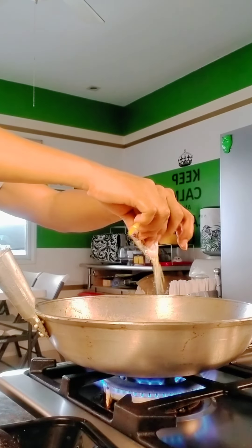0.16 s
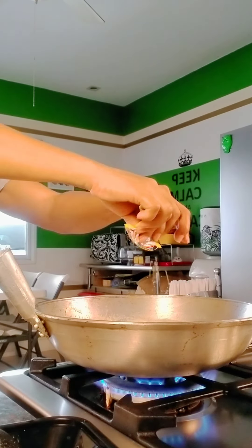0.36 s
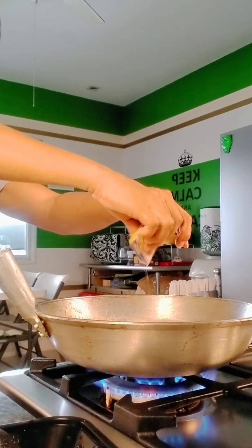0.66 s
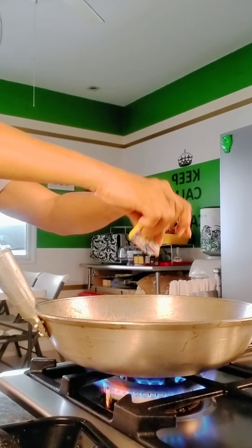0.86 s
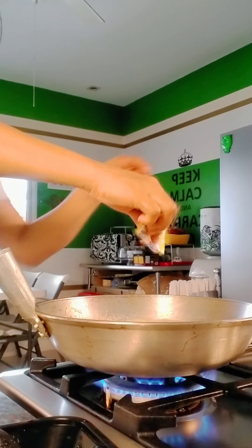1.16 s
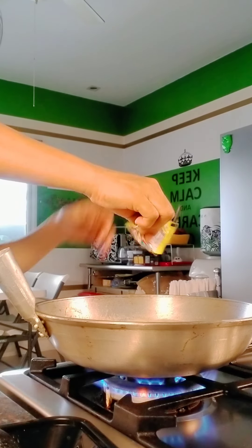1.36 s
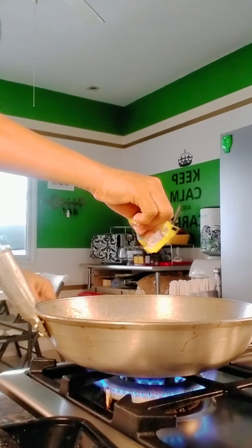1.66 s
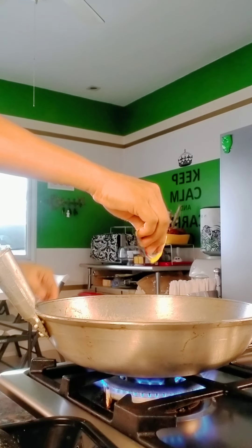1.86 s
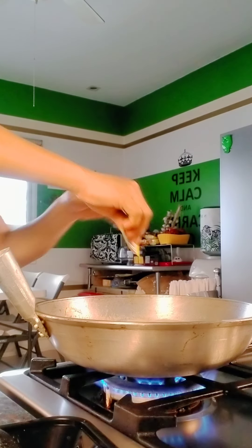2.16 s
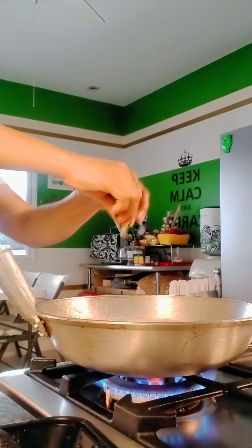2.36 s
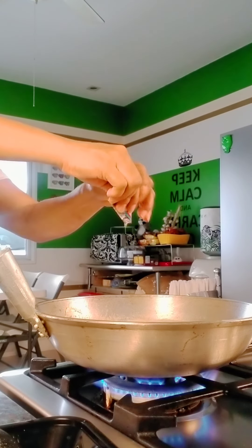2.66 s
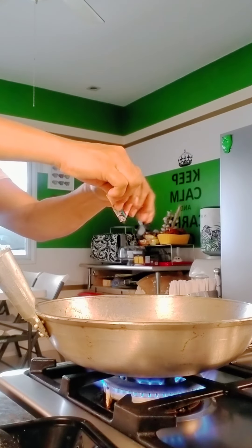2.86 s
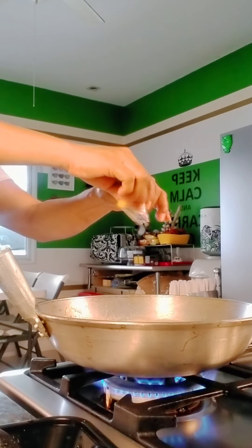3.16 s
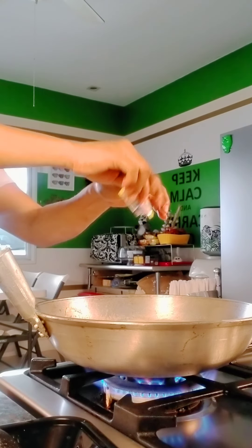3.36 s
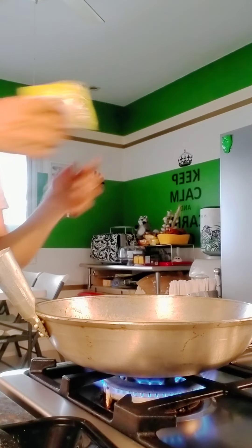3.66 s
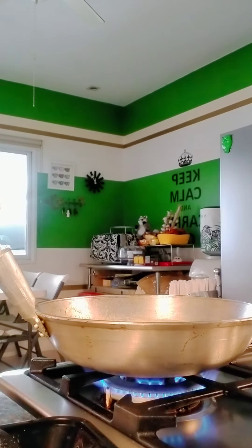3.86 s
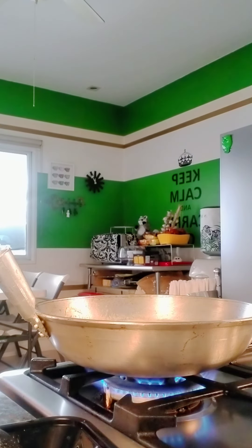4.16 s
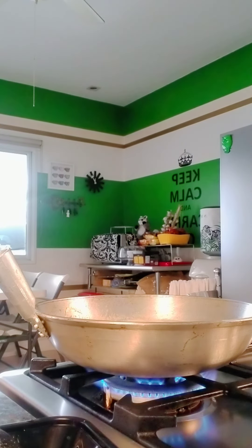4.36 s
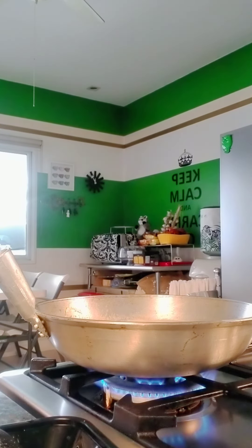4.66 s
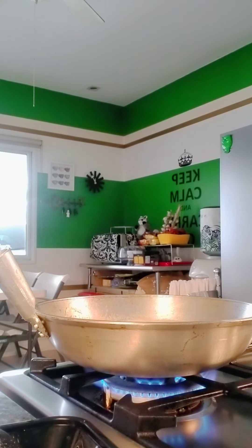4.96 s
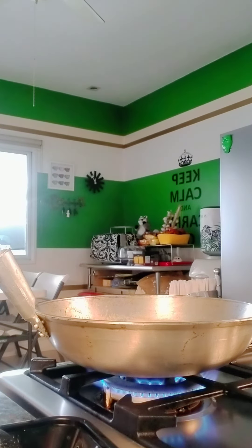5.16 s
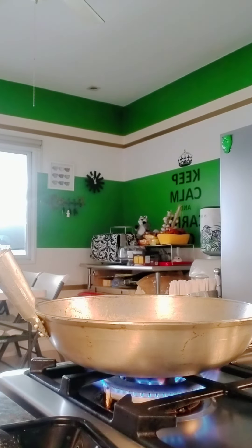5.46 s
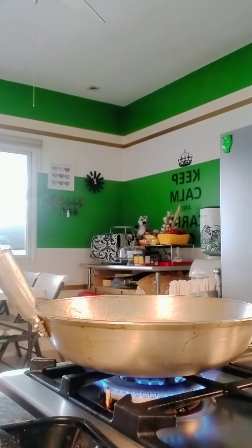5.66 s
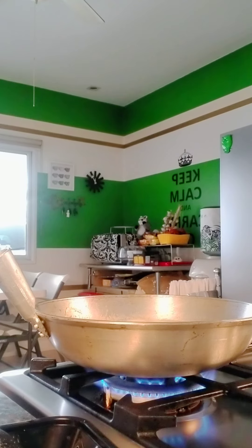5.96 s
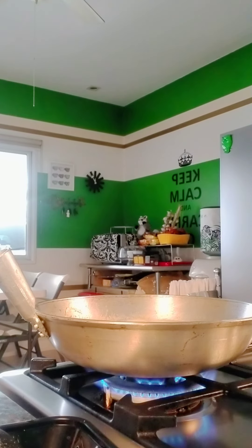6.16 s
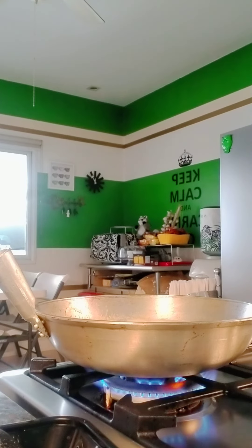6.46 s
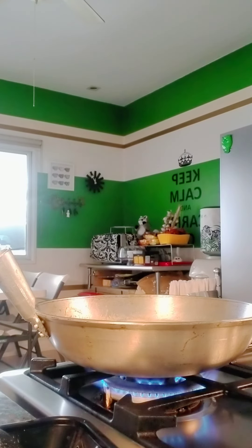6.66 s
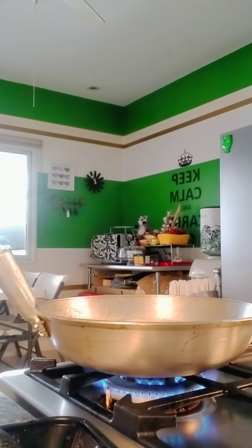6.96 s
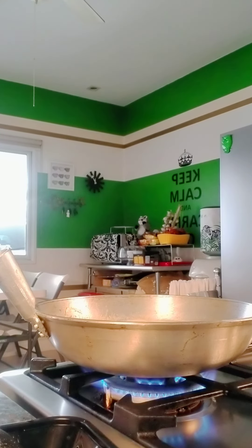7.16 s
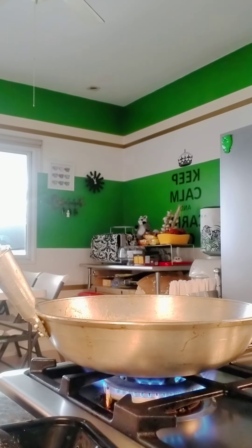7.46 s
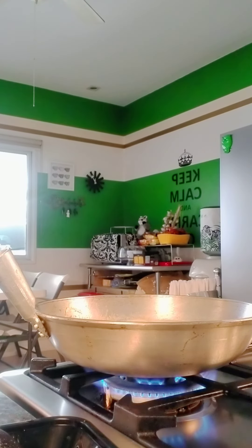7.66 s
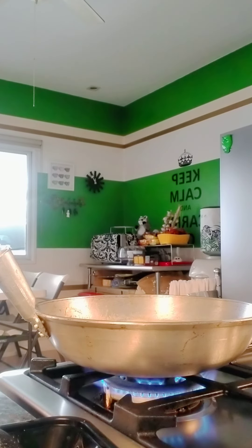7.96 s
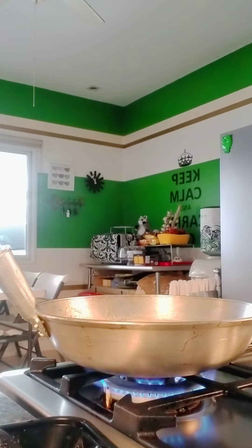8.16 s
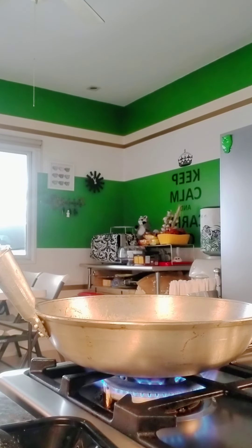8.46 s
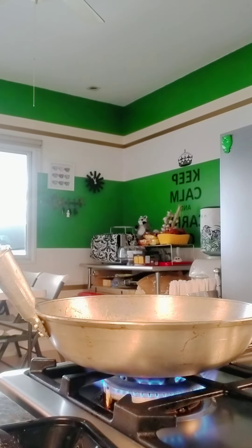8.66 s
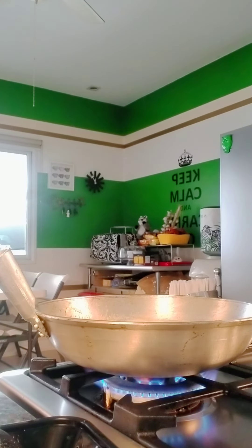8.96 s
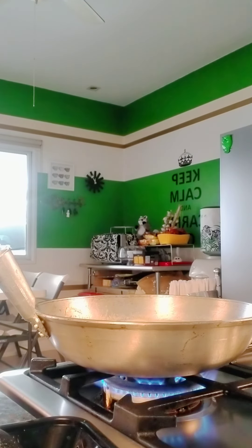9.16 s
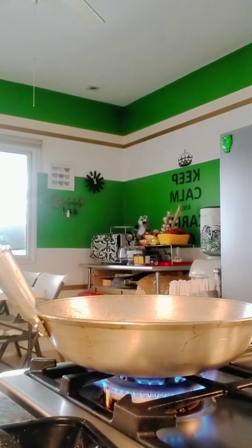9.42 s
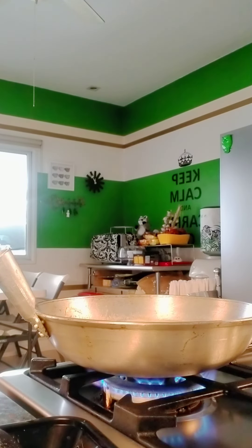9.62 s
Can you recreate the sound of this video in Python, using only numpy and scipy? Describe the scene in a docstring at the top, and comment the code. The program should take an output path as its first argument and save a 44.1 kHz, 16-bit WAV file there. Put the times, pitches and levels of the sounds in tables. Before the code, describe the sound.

Close, bright crinkling of a small plastic sachet with rhythmic rattling doses of dry granules for about three seconds, then thinner crackles. Around the middle come a cluster of hard wooden clacks and a few later knocks; later a drawer rolls briefly with a low rumble. A faint gas flame hisses and roars softly throughout. Mono, bass-light phone-like microphone in a hard-walled kitchen.

```python
"""A small plastic seasoning sachet crinkles and snaps as it is shaken and crumpled over a wok.
Film buckles as random click showers and resonant facet noise; granules are denser, coloured clicks.
Wooden clacks are noise cracks on damped modes; a drawer then rolls, its grain noise scaled by its speed.
A gas flame of filtered noise and faint tones runs beneath, all heard in mono in a hard-walled kitchen."""
import sys
import numpy as np
from scipy import signal
from scipy.fft import rfft, irfft, next_fast_len
from scipy.io import wavfile
from scipy.ndimage import map_coordinates

SR = 44100
rng = np.random.default_rng(int(sys.argv[2]) if len(sys.argv) > 2 else 0)


def file_out(sig):
    """Save sig as 16-bit WAV at sys.argv[1]."""
    # one column per channel
    cols = np.atleast_2d(sig).T
    # limit, then scale
    lim = np.clip(cols, -1, 1)
    pcm = np.round(lim * 32767).astype(np.int16)
    wavfile.write(sys.argv[1], SR, pcm)


N = 431738

RELAX_T60_S = 0.18  # release of the squeezed film and of the trickle of granules


def amp(db):
    """Logarithmic level: decibels become an amplitude ratio."""
    return 10 ** (np.asarray(db) / 20)


def unit(x):
    """Normalization: the signal is scaled to a root-mean-square value of 1."""
    return x / np.sqrt(np.mean(x ** 2) + 1e-20)


def along(points, hz):
    """Logarithmic pitch: (Hz, value) points are interpolated on a log-frequency axis."""
    point_hz, values = np.transpose(points)
    return np.interp(np.log(hz + 1), np.log(point_hz + 1), values)


def wobble(rate):
    """Slow random modulation: a smooth curve through Gaussian knots, rate of them a second."""
    knots = rng.standard_normal(int(N * rate / SR) + 4)
    return map_coordinates(knots, [np.arange(N) * rate / SR])


def coloured(x, spectrum):
    """Minimum-phase filtering: folding the cepstrum makes a causal response of unit power gain."""
    size = 4096
    magnitude = unit(amp(along(spectrum, np.fft.rfftfreq(size, 1 / SR))))
    cepstrum = irfft(np.log(magnitude))
    cepstrum[1:size // 2] *= 2
    cepstrum[size // 2 + 1:] = 0
    response = irfft(np.exp(rfft(cepstrum)))
    return signal.fftconvolve(x, response)[:len(x)]


def grains(rate, spread_db):
    """Shot noise: random impulses of uneven size and either sign, rate of them a second, at rms 1."""
    present = rng.random(N) < rate / SR
    size = amp(spread_db * np.minimum(rng.standard_normal(N), 2))
    sign = rng.choice([-1, 1], N)
    return unit(present * size * sign)


def add(track, s, sound):
    """Superposition: a sound is summed into the track from time s in seconds."""
    part = track[max(round(s * SR), 0):][:len(sound)]
    part += sound[:len(part)]


def ring(modes, t, scatter_db):
    """Modal vibration: damped sinusoids sum, with a random phase and strength at each strike."""
    total = np.zeros(len(t))
    for hz, db, t60 in modes:
        strength_db = db + scatter_db * rng.standard_normal()
        total += amp(strength_db - 60 * t / t60) * np.sin(2 * np.pi * hz * t + 2 * np.pi * rng.random())
    return total


def stroke(s, length, rise, t60):
    """Envelope of a gesture: exponential onset at s, a hold for length, then exponential decay."""
    t = np.arange(round((length + 1.5 * t60) * SR)) / SR
    envelope = np.zeros(N)
    onset = 1 - np.exp(-t / rise)
    release = amp(-60 * np.maximum(t - length, 0) / t60)
    add(envelope, s, onset * release)
    return envelope


def crackle(rate, spread_db, t60, colour_db):
    """Crackling noise: abrupt random bursts, each with its own balance of bands, decay exponentially."""
    # Borders in Hz between the bands whose strength varies from click to click.
    band_edges = [1400, 2200, 3200, 4500, 6200, 8200]
    clicks = grains(rate, spread_db)
    at = np.flatnonzero(clicks)
    size = next_fast_len(N)
    noise = rfft(rng.standard_normal(size))
    band = np.searchsorted(band_edges, np.fft.rfftfreq(size, 1 / SR))
    energy_keep = amp(-120 / (t60 * SR))  # energy left after one sample
    sound = np.zeros(N)
    for k in range(len(band_edges) + 1):
        strengths = clicks[at] * amp(colour_db * rng.uniform(-1, 1, len(at)))
        deposits = np.bincount(at, strengths ** 2, N)
        energy = signal.lfilter([1], [1, -energy_keep], deposits)
        sound += np.sqrt(energy) * irfft(noise * (band == k), size)[:N]
    return unit(sound)


def sachet():
    """Buckling instability: squeezed film gives showers of tiny clicks, and whole facets snap through."""
    # Squeezes and rubs of the fingers. Each row: start in seconds, length in seconds, relative level in dB.
    squeezes = [(0.0, .58, -38), (0.636, .09, -39), (0.81, 0.11, -49), (0.937, 1.16, -38.5),
                (2.287, 0.048, -38), (2.37, 0.037, -42.5), (2.45, 0.25, -49), (2.524, 0.055, -40),
                (2.742, 0.23, -39), (3.0, 0.03, -40), (3.102, .21, -39.5), (3.425, .005, -48),
                (3.513, 0.066, -44.5), (3.58, .1, -55), (3.782, .01, -48), (3.86, 0.077, -42.5),
                (3.986, 0.043, -46.5), (4.48, 0.076, -66), (4.705, 0.17, -55.5), (4.931, 0.052, -44),
                (5.01, .012, -45.5), (5.104, 0.02, -39.5), (5.158, 0.025, -40.5), (5.296, 0.055, -52.5),
                (7.956, 0.059, -50.5), (8.142, 0.031, -51.5)]
    # Loudest buckles. Each row: time in seconds, relative level in dB, facet pitch in Hz (capped at SR / 3).
    snaps = [(0.038, -14, 3170), (0.1, -12, 3500), (0.134, -15, 6800), (0.162, -13.5, 6710),
             (0.2298, -13.5, 6950), (0.2538, -20, 1870), (0.5746, -16.5, 6800), (0.6404, -11, 4950),
             (0.6546, -18, 7090), (0.817, -23.5, 3100), (0.8818, -19, 7090), (0.9357, -17, 7160),
             (1.0193, -11.5, 6470), (1.1324, -19, 1880), (1.29, -12.5, 7440), (1.3275, -12, 6140),
             (1.417, -20, 2800), (1.4502, -22, 4920), (1.736, -14.5, 2390), (1.8846, -16.5, 6040),
             (1.953, -16.5, 3620), (2.0108, -13.5, 2600), (2.2314, -21, 6400), (2.2574, -23, 7050),
             (2.2933, -20, 6930), (2.377, -27, 6630), (2.4507, -26, 4700), (2.4692, -24, 6630),
             (2.5237, -22, 6940), (2.5583, -23.5, 6890), (2.6652, -19, 6000), (2.709, -18.5, 5950),
             (2.7477, -14, 6270), (3.092, -19, 7080), (3.1118, -21, 2820), (3.1732, -17.5, 6890),
             (3.2494, -17, 3790), (3.4305, -27, 7100), (3.5045, -18.5, 7100), (3.535, -18.5, 7060),
             (3.578, -27, 6830), (3.621, -23, 2210), (3.7258, -26, 1760), (3.7787, -23.5, 7500),
             (3.79, -24, 2820), (3.8604, -31, 6860), (3.9137, -22.5, 7700), (3.9843, -25.5, 2720),
             (4.7485, -30.5, 2370), (4.9377, -30, 2670), (4.9588, -22.5, 2350), (5.0168, -23, 2190),
             (5.1056, -32, 7200), (5.1164, -24, 7800), (5.5835, -16, 2590), (5.694, -26, 2140),
             (5.8769, -23.5, 1870), (5.916, -26, 7100), (7.961, -26.5, 6900)]
    # Spectrum of the film. Each row: frequency in Hz, relative density in dB.
    film_spectrum = [(400, -35), (1000, -2), (1700, 1.5), (2700, 5), (4200, 0), (5800, -1), (7400, 3),
                     (10500, 3.5), (13500, 3), (16000, 2.5)]
    grip_s = 0.001
    bite_db, bite_t60_s = -4, 0.056  # extra strength at the start of a squeeze, against that squeeze
    handling = np.zeros(N)
    for s, length, db in squeezes:
        hold = stroke(s, length, grip_s, RELAX_T60_S)
        bite = amp(bite_db) * stroke(s, 0, grip_s, bite_t60_s)
        handling = np.maximum(handling, amp(db) * (hold + bite))
    creases = crackle(rate=650, spread_db=3.5, t60=0.018, colour_db=4)
    film = amp(5.0) * handling * creases
    t = np.arange(SR // 8) / SR
    tick = 0.23 * amp(-60 * t / 0.0049)
    fold = np.exp(-(t / 0.012) ** 2)  # the fold runs across the facet
    shiver = amp(-7.5) * amp(-60 * t / 0.088)  # then the whole sheet settles
    burst = tick + fold + shiver
    facets = np.zeros(N)
    for s, db, hz in snaps:
        add(film, s, amp(db - 17) * burst * rng.standard_normal(len(t)))
        resonance = signal.iirpeak(min(hz, SR / 3), 3.5, SR)
        facet = signal.lfilter(*resonance, rng.standard_normal(len(t)))
        add(facets, s, amp(db - 19.5) * burst * unit(facet))
    return coloured(film, film_spectrum) + facets


def seasoning():
    """Granular impact: many small collisions rattle in doses; a tap adds a pulse and packet modes."""
    # Shakes of the sachet. Each row: time of the dose's peak in seconds, relative level in dB.
    shakes = [(0.26, -31), (0.39, -26), (0.465, -34.5), (0.648, -31), (0.965, -33), (1.144, -27),
              (1.305, -29), (1.47, -27), (1.62, -25.5), (1.773, -26.5), (1.94, -27), (2.06, -35.5),
              (2.315, -32), (2.56, -46), (2.762, -27.5), (2.905, -36), (3.115, -33), (3.27, -36.5)]
    # Spectrum of the granules. Each row: frequency in Hz, relative density in dB.
    granule_spectrum = [(400, -21.5), (800, 0), (1350, -22), (1750, 3.5), (2300, -7.5), (3400, 0.5),
                        (4500, -1), (6200, -1), (7500, 1), (8800, -10), (16000, -13.5)]
    # A finger taps the sachet: time in seconds, relative level in dB.
    tap = (1.303, -19.5)
    # Modes of the half-full sachet. Each row: frequency in Hz, relative level in dB, t60 in seconds.
    packet_modes = [(178, -6, 0.046), (1350, 3, 0.037)]
    rise_s, fall_s = 0.017, 0.04  # time constants of a dose
    # a thin trickle goes on for two seconds while the sachet is tipped
    flow = amp(-46.5) * stroke(0.0, 2, rise_s, RELAX_T60_S)
    lag = np.arange(-SR // 8, SR // 3) / SR
    dose = np.exp(np.minimum(lag / rise_s, -lag / fall_s))
    for s, db in shakes:
        add(flow, s + lag[0], amp(db) * dose)
    patter = crackle(rate=700, spread_db=4, t60=0.011, colour_db=7)
    pour = amp(-2.5) * flow * coloured(patter, granule_spectrum)
    s, db = tap
    t = np.arange(SR // 10) / SR
    u = t / 0.00073
    pulse = (1 - u) * np.exp(-u)
    rustle = amp(-4) * amp(-60 * t / 0.018) * rng.standard_normal(len(t))
    dull_band = signal.butter(2, [210, 1700], "band", fs=SR, output="sos")
    add(pour, s, amp(db + 8.0) * signal.sosfilt(dull_band, pulse + rustle))
    add(pour, s, amp(db - 16) * ring(packet_modes, t, scatter_db=0.5))
    return pour


def knocks():
    """Impact and friction: each contact cracks, excites wood and hollow modes, and ends in a rub."""
    # Wooden contacts. Each row: time in seconds, relative clack level in dB, relative hollow-body level in dB.
    contacts = [(5.3256, -30, -42), (5.3639, -33, -43), (5.3861, -24, -55), (5.4037, -20.5, -60),
                (5.429, -13, -26), (5.468, -25, -42), (5.4934, -10, -29), (5.5387, -21, -37),
                (5.5818, -24, -54), (5.8226, -30.5, -64), (5.8767, -24.5, -33.5), (5.9515, -25.5, -32.5),
                (6.084, -34.5, -62)]
    # Slides of the wood. Each row: start in seconds, length in seconds, relative level in dB.
    slides = [(5.32, 0.072, -45.5), (5.897, 0.079, -41)]
    # Modes of the wood, then of the hollow. Each row: frequency in Hz, relative level in dB, t60 in seconds.
    wood_modes = [(1278, 0, 0.07), (1450, -8, 0.035), (1680, -1, 0.073), (1856, 2, 0.062), (2280, -19, .06),
                  (2300, -7, 0.1), (2840, -7, 0.05), (3170, -5, 0.049), (3680, -7, 0.072)]
    hollow_modes = [(125, -19, .12), (190, -6, 0.15), (385, -4, 0.11), (419, 1, 0.07), (503, 2.5, 0.086),
                    (573, -5, 0.081), (653, -7, 0.087), (733, -12, 0.21)]
    # Spectra of the crack, then of the rub. Each row: frequency in Hz, relative density in dB.
    clack_spectrum = [(100, -36), (300, -4), (700, 1), (1300, 4), (3400, 0.5), (4200, -5.5), (7000, -11.5),
                      (16000, -13.5)]
    rub_spectrum = [(50, -55), (85, -20), (120, -3), (180, 0.5), (290, -7), (420, -1), (750, -13),
                    (1200, -25), (2400, -12), (5000, -33.5), (16000, -25)]
    rub_db, rub_t60_s = -24, 0.21  # the rub after a contact, against the table's clack level
    t = np.arange(SR // 3) / SR
    cracks, wood, friction = np.zeros(N), np.zeros(N), np.zeros(N)
    for s, length, db in slides:
        friction += amp(db) * stroke(s, length, rise=0.015, t60=0.17)
    crack = amp(-60 * t / 0.0067) + amp(-3.5) * amp(-60 * t / 0.091)
    hollow_onset = 1 - np.exp(-t / 0.0032)
    for s, db, body_db in contacts:
        add(cracks, s, amp(db - 11) * crack * rng.standard_normal(len(t)))
        add(wood, s, amp(db - 18) * ring(wood_modes, t, scatter_db=0))
        add(wood, s, amp(body_db + 1) * ring(hollow_modes, t, scatter_db=1.5) * hollow_onset)
        add(friction, s, amp(db + rub_db - 60 * t / rub_t60_s))
    rubbing = friction * coloured(grains(rate=1200, spread_db=4.5), rub_spectrum)
    return coloured(cracks, clack_spectrum) + wood + rubbing


def drawer():
    """Rolling contact: small bumps rumble and scrape with speed, and jolts ring the panels and rails."""
    # Motion of the drawer. Each row: time in seconds, speed from 0 to 1.
    motion = [(8.177, 0.1), (8.187, 1), (8.28, 0.88), (8.61, 0.01)]
    # Jolts on the way. Each row: time in seconds, relative level in dB, ringing panel's pitch in Hz.
    jolts = [(8.181, -21, 212), (8.248, -20.5, 540.6), (8.281, -23, 179), (8.358, -22, 508),
             (8.381, -30, 196), (8.478, -35, 500)]
    # Modes of the rails. Each row: frequency in Hz, relative level in dB, t60 in seconds.
    rail_modes = [(729, 3, 0.22), (1002, 3, 0.27), (1435, 3, .2), (2345, -5, 0.27)]
    # Spectra of the box, then of the runners. Each row: frequency in Hz, relative density in dB.
    box_spectrum = [(30, -58), (55, -38), (76, -23), (94, 1), (120, 2.5), (145, -5.5), (195, 1), (270, 0),
                    (320, -8), (395, -3), (450, -4), (520, -3), (640, -6.5), (740, -7), (1000, -15),
                    (1400, -36)]
    runner_spectrum = [(600, -8), (1200, 1), (1450, 5.5), (2000, 1), (2450, 2.5), (3200, -2.5),
                       (3900, -11.5), (7200, -11.5), (16000, -13)]
    speed = np.interp(np.arange(N) / SR, *np.transpose(motion), left=0, right=0)
    rumble = amp(-29.5) * speed
    scrape = amp(-33) * speed ** 1.52  # as the drawer slows, the scrape dies before the rumble
    scrape += amp(-46) * stroke(8.145, 0.028, rise=0.008, t60=0.046)  # a creak as the hand takes hold
    box = rumble * coloured(grains(rate=1500, spread_db=3.5), box_spectrum)
    rails = scrape * coloured(grains(rate=4000, spread_db=2.5), runner_spectrum)
    t = np.arange(SR // 3) / SR
    swell = (1 - np.exp(-t / 0.01)) * np.exp(-(t / 0.036) ** 2)
    for s, db, hz in jolts:
        panel = amp(-1.5) * swell * np.sin(2 * np.pi * hz * t)
        rail = amp(-21.5) * ring(rail_modes, t, scatter_db=1)
        add(box, s, amp(db) * (panel + rail))
    return box + rails


def burner():
    """Turbulent combustion: broadband roar and gas-jet hiss fluctuate slowly beside faint steady tones."""
    # Level of the burner. Each row: time in seconds, relative level in dB.
    flame = [(0.0, -47.5), (1.0, -46.5), (3.9, -47), (4.4, -51), (5.3, -46), (6.5, -50.5), (7.8, -51.5),
             (8.3, -44.5), (9.0, -49), (9.79, -48)]
    # Spectra of the roar, then of the gas jet. Each row: frequency in Hz, relative density in dB.
    roar_spectrum = [(25, -67), (47, -43), (58, -11), (75, -16.5), (120, -3.5), (200, 0), (300, -3.5),
                     (410, -4), (620, -7.5), (760, 1), (950, 3), (1060, -6.5), (1220, -3), (1400, -26),
                     (2500, -33)]
    jet_spectrum = [(700, -20), (1400, 1), (3000, 0.5), (3800, -8.5), (4900, -11.5), (7100, -8),
                    (10500, -7.5), (16000, -3.5)]
    # Tones under the flame. Each row: frequency in Hz, mean level in dB against the burner level.
    hum_tones = [(209, -12), (290.7, -10.5), (5093, -29)]
    # A thin tone by the stove that fades away. Each row: time in seconds, level in dB.
    whine_level = [(0, -52.5), (3.8, -54.5), (9.79, -69)]
    whine_hz = 519.6
    t = np.arange(N) / SR
    level = amp(np.interp(t, *np.transpose(flame)))
    roar = amp(1.5 + 0.83 * wobble(9.8)) * coloured(rng.standard_normal(N), roar_spectrum)
    jet = amp(-3.5 + 0.22 * wobble(3.1)) * coloured(rng.standard_normal(N), jet_spectrum)
    hum = np.zeros(N)
    for hz, db in hum_tones:
        hum += amp(db + 1.7 * wobble(2.6)) * np.sin(2 * np.pi * hz * t + 0.5 * wobble(4))
    whine = np.sin(2 * np.pi * whine_hz * t + 0.53 * wobble(3.8))
    whine *= amp(np.interp(t, *np.transpose(whine_level)))
    return level * (roar + jet + hum) + whine


def kitchen(x):
    """Diffuse reverberation: convolution with noise whose decay time depends on frequency."""
    # Reverberation of the room. Each row: frequency in Hz, t60 in seconds.
    decay = [(150, 0.74), (1000, 0.49), (4000, 0.69), (8000, 0.58), (15000, 0.66)]
    hz, t, z = signal.stft(rng.standard_normal(SR * 2 // 3), SR, nperseg=256)
    fading = amp(-60 * t / along(decay, hz)[:, None])
    tail = signal.istft(z * fading, SR, nperseg=256)[1]
    tail = np.pad(tail, (round(0.008 * SR), 0))  # 8 ms before the tail begins
    return signal.fftconvolve(x, tail / np.linalg.norm(tail))[:N]


def scene():
    """Superposition: direct sounds, their shares of the room's reverberation and the dry burner sum in mono."""
    near, wood, roll = sachet() + seasoning(), knocks(), drawer()
    room = kitchen(amp(-6.0) * near + amp(-10.5) * wood + amp(-8.0) * roll)
    mono = near + wood + roll + room + burner()
    return np.array([mono, mono])


def record(dry):
    """Transduction: a microphone port colours the sound, its treble power is limited, its band is cut off."""
    # Response of the port, with little bass. Each row: frequency in Hz, gain in dB.
    port = [(25, -19), (42, -16), (57, 0.5), (3200, 0), (4500, -0.5), (5600, 0.5), (7100, 3.5),
            (7700, -1.5), (8200, -5.5), (10500, -8.5), (13300, -3), (16000, -7.5)]
    split_hz, top_hz = 8200, 15950  # lower edge of the limited treble, upper edge of the band
    ceiling_db, average_s = -39, 0.0019  # soft power ceiling and averaging time of the limiter
    size = next_fast_len(N + SR // 2)
    hz = np.fft.rfftfreq(size, 1 / SR)
    heard = rfft(dry, size) * amp(along(port, hz))
    treble = irfft(heard * (hz > split_hz), size)
    keep = np.exp(-1 / (average_s * SR))
    power = signal.lfilter([1 - keep], [1, -keep], treble[0] ** 2)
    gain = np.sqrt(1 / np.hypot(1, power / amp(ceiling_db) ** 2))
    limited = heard + rfft(treble * (gain - 1))
    return irfft(limited * (hz < top_hz), size)[:, :N]


dry = scene()
out = record(dry)
file_out(out)
```